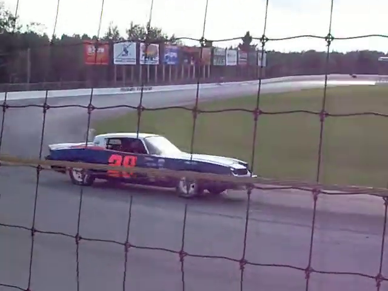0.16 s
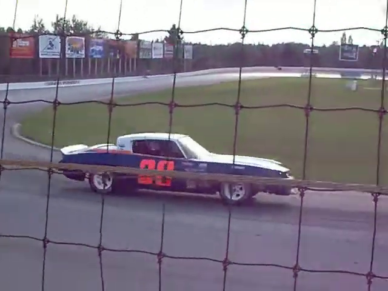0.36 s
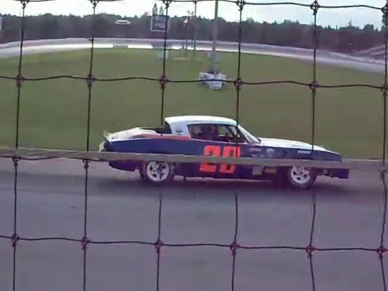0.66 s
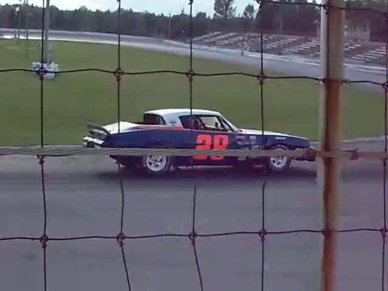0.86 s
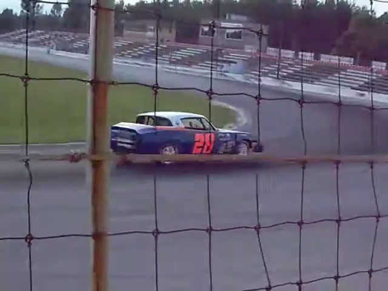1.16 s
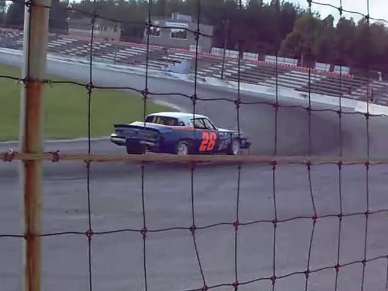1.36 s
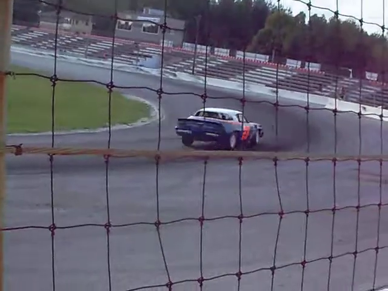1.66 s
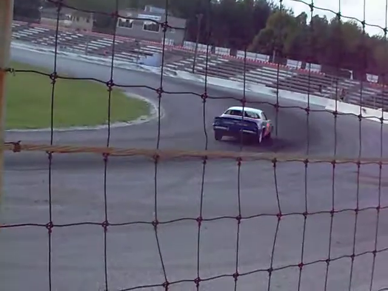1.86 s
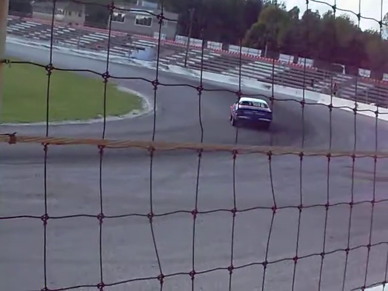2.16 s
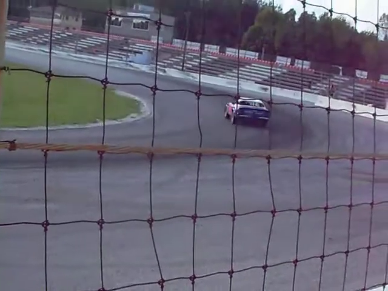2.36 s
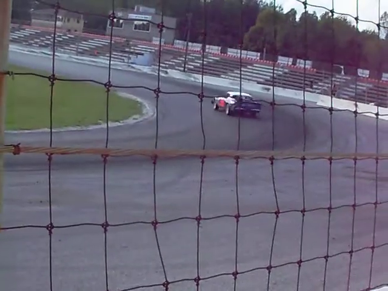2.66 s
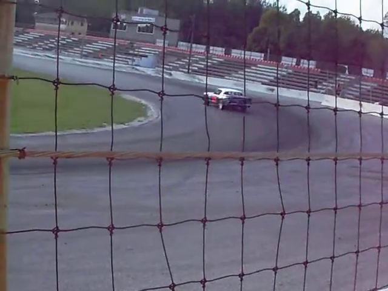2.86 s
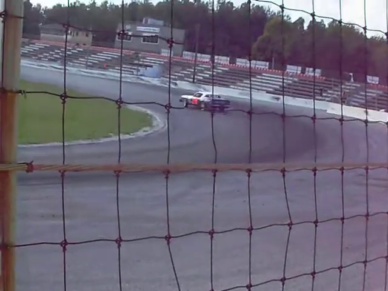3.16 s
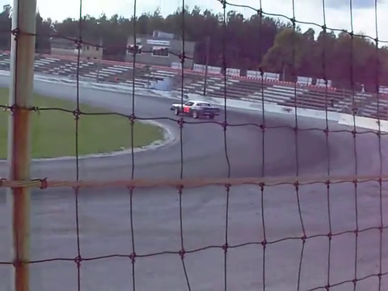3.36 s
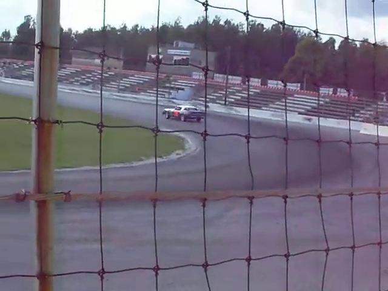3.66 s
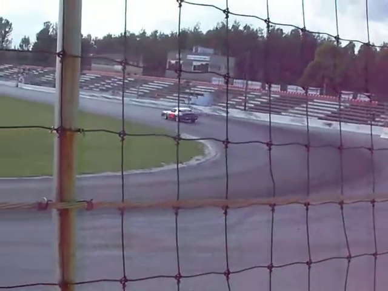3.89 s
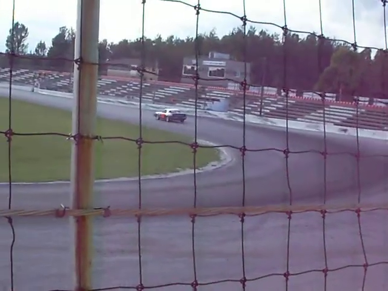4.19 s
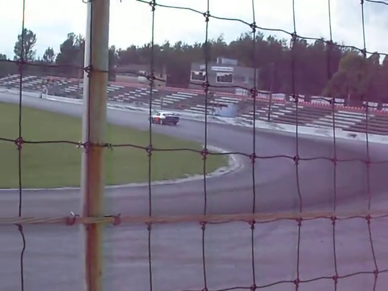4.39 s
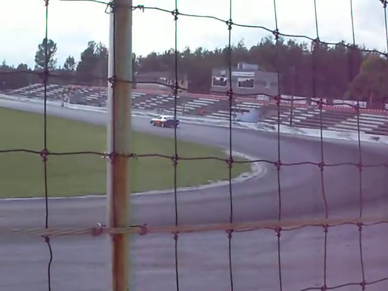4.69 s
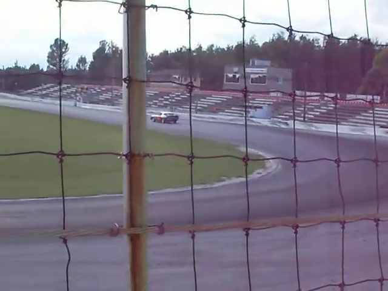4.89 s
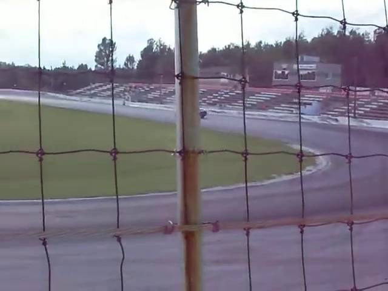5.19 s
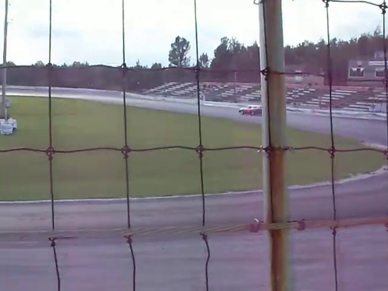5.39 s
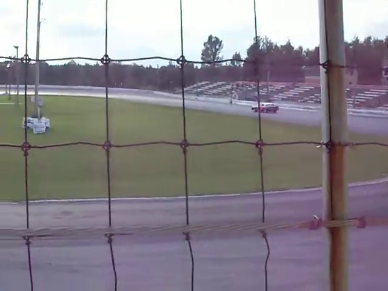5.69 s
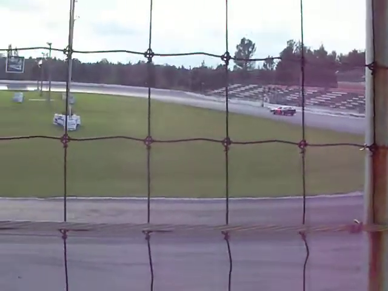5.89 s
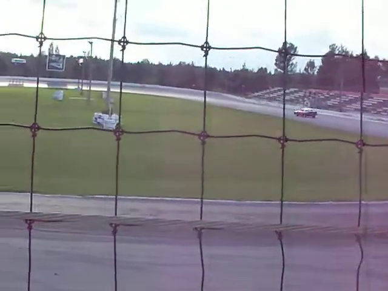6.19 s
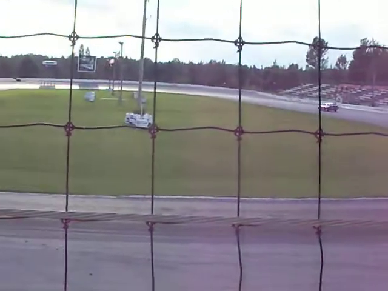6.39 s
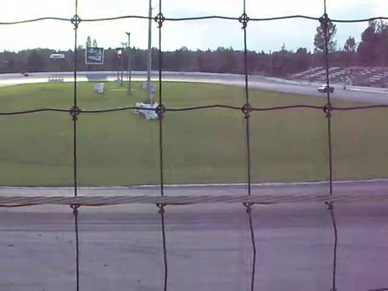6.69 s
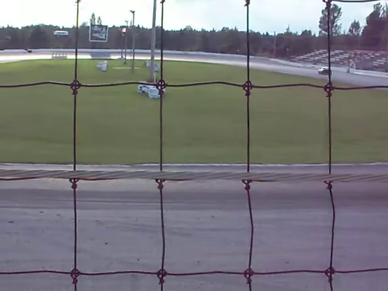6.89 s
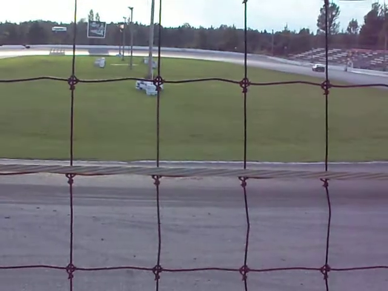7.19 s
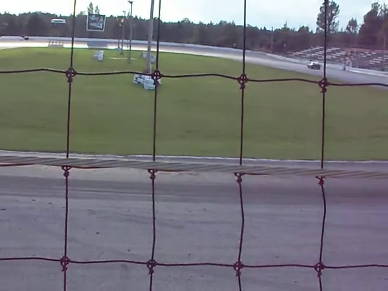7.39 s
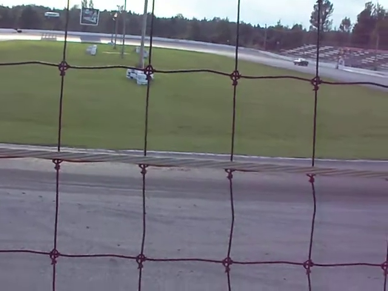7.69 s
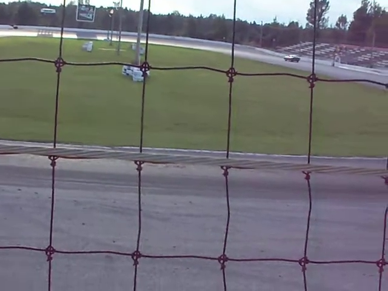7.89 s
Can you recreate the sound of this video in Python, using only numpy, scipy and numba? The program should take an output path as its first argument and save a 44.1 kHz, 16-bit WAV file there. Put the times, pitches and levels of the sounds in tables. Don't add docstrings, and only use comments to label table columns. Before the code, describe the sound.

A rough open-pipe V8 race car blasts past very close, drops in pitch, accelerates away around the track, then lifts off to a distant drone.

```python
import sys
import numpy as np
from scipy import signal
from scipy.fft import rfft, irfft, next_fast_len
from scipy.io import wavfile
from scipy.ndimage import uniform_filter1d
from numba import njit

SR = 44100
rng = np.random.default_rng(int(sys.argv[2]) if len(sys.argv) > 2 else 0)


def ratio_of_db(decibels):
    return 10 ** (np.asarray(decibels, float) / 20)


def pcm_store(signal):
    levels = np.round(np.clip(np.atleast_2d(signal), -1, 1) * 32767)
    wavfile.write(sys.argv[1], SR, levels.astype(np.int16).T)


N = 355005


def level(x, db):
    return x * ratio_of_db(db) / np.sqrt(np.mean(x ** 2))


def columns(table):
    s, *rest = np.transpose(table)
    return [np.interp(np.arange(N) / SR, s, c) for c in rest]


def band(x, hz, width):
    return signal.lfilter(*signal.iirpeak(hz, hz / width, fs=SR), x)


def butter(x, order, hz, kind="low"):
    return signal.sosfilt(signal.butter(order, hz, kind, fs=SR, output="sos"), x)


def colour(x, points):
    hz, db = np.transpose(points)
    size = next_fast_len(N + SR // 4)
    f = np.arange(size // 2 + 1) * SR / size + 1
    gain = ratio_of_db(np.interp(np.log(f), np.log(hz), db))
    return irfft(rfft(x, size) * gain, size)[:N]


def walk(rate):
    k = int(SR / rate)
    steps = np.repeat(rng.standard_normal(N // k + 1), k)
    return 1.142 * uniform_filter1d(uniform_filter1d(steps, k), k)[:N]


def swell(rows, fade_s):
    t = np.arange(0, N + 64, 64) / SR
    gain = 0
    for start, end, db in rows:
        gain = gain + ratio_of_db(db) * (np.tanh((t - start) / fade_s) - np.tanh((t - end) / fade_s)) / 2
    return np.interp(np.arange(N) / SR, t, gain)


def bloom(x, hz, lift, half_width_hz):
    turn = np.exp(2j * np.pi * np.cumsum(hz) / SR)
    slow = butter(x / turn, 1, half_width_hz)
    return x + np.clip(lift, 0, 2) * 2 * (slow * turn).real


def air():
    # (frequency [Hz], density [dB])
    air_tilt = [(24, -50), (40, -31), (155, -11), (333, -10.5), (427, -12.5), (1580, -12), (2320, -26.5),
                (4260, -16.5), (7160, -31), (8770, -54), (11400, -90.5), (19300, -120)]
    return level(colour(rng.standard_normal(N), air_tilt), -52) * ratio_of_db(0.4 * walk(2.9))


def wind():
    # (time [s], peak level [dB])
    gusts = [(.04, -39), (.24, -30.5), (.9, -36), (2.78, -51), (3.75, -47), (4.41, -35), (5.09, -43),
             (5.47, -50), (5.84, -33), (5.97, -30.5), (6.22, -42), (6.41, -42), (6.57, -44), (6.97, -37),
             (7.15, -45), (7.69, -42), (7.85, -45), (8.05, -34)]
    rise_db_s, fall_db_s, calm_db = 142.5, 112.5, -54
    port = [(8, -8.5), (18, 1), (33, 19), (50, -1), (90, -7.5), (200, -60.0)]  # (Hz, dB)
    bumps = colour(rng.standard_normal(N), port)
    bumps = bumps / np.sqrt(uniform_filter1d(bumps ** 2, size=12000))
    t, gust_db = np.arange(N) / SR, calm_db
    for s, db in gusts:
        gust_db = np.maximum(gust_db, db - np.maximum(rise_db_s * (s - t), fall_db_s * (t - s)))
    return bumps * ratio_of_db(uniform_filter1d(gust_db, size=1500))


def knocks():
    # (time [s], level [dB], decay [s])
    bumps = [
        (1.345, -34.5, .03),
        (4.3, -41.5, 0.057),
        (4.43, -39, .05),
    ]
    t = np.arange(N) / SR
    shape = sum(ratio_of_db(db) * (t > s) * np.exp(-np.abs(t - s) / decay_s) for s, db, decay_s in bumps)
    body = [(20, -12), (60, 1), (330, 0), (600, -18), (2000, -44)]  # (Hz, dB)
    return shape * level(colour(rng.standard_normal(N), body), 0)


@njit
def walls(x, lags, gain, damp):
    line, soft, out = np.zeros((8, 8192)), np.zeros(8), np.zeros(len(x))
    for i in range(len(x)):
        total = 0.
        for k in range(8):
            soft[k] += (1 - damp) * (gain[k] * line[k, (i - lags[k]) & 8191] - soft[k])
            total += soft[k]
        out[i] = soft[0] - soft[1] + soft[2] - soft[3]
        for k in range(8):
            line[k, i & 8191] = x[i] + soft[k] - total / 4
    return out


def stands(x):
    t60_s, damp = 1, 0.59
    lags = rng.integers(1200, 6000, 8)
    return ratio_of_db(-11) * walls(x, lags, ratio_of_db(-60 * lags / SR / t60_s), damp)


def track_bounce(x):
    # (time [s], comb top [Hz], share of the bounce [0-1])
    comb = [(0, 4250, 0), (.5, 4740, 0.08), (2.1, 4240, 0.59), (2.7, 4260, 0.47), (3.3, 4130, 0.38),
            (5.0, 4450, 0.26), (5.3, 4230, 0.52), (6.9, 4020, 0.76), (8.05, 3820, 0.67)]
    top_hz, share = columns(comb)
    share = np.clip(share, 0, .9)
    x = bloom(x, top_hz, 1.8 * share ** 2, 150)
    lag = round(0.00027 * SR)
    late = np.roll(signal.hilbert(x, next_fast_len(N))[:N], lag) * np.exp(2j * np.pi * top_hz * lag / SR)
    return (x + share * late.real) / np.sqrt(1 + share ** 2)


def side_paths(x, smear):
    # (delay [ms], level [dB])
    paths = [(3.1, -4), (7.3, -5), (12.5, -7), (19, -8)]
    out, now = x, np.arange(N)
    for ms, db in paths:
        lag = SR / 1000 * (ms + .9 * walk(1.2))
        out = out + (.35 + .9 * smear) * ratio_of_db(db) * np.interp(now - lag, now, x)
    return out


def patchy(x, slow_db, quick_db):
    out = x
    for hz in 1200 * 1.25 ** np.arange(9):
        drift = ratio_of_db(slow_db * walk(2.375) + quick_db * walk(45))
        out = out + (drift - 1) * band(x, hz, hz / 5)
    return out


def rumble(body_db, smear):
    # (frequency [Hz], density [dB])
    rumble_tilt = [(40, -21.5), (80, -5.5), (150, 4), (300, -1.5), (420, -12), (600, -32.5)]
    return smear * ratio_of_db(body_db) * level(colour(rng.standard_normal(N), rumble_tilt), -11)


def thud(cycle):
    near = ratio_of_db(-27) * np.exp(-.5 * ((np.arange(N) / SR - .25) / .06) ** 2)
    dip = np.exp(3 * (np.cos(2 * np.pi * (cycle + .25)) - 1))
    return -3 * near * (dip - dip.mean())


def drone(cycle, body_db, smear):
    main_orders = np.array([3, 5, 6, 8, 10, 11])
    # (multiple, level re body [dB])
    minor_orders = [(1, -29), (2, -20.5), (4, -18), (7, -17.5), (9, -20), (12, -22.5)]
    # (start [s], end [s], level [dB])
    order_swells = [
        [(0, .4, -31.5), (.54, 1.2, -31.5), (2.42, 4.2, -38), (4.42, 5.97, -41.5), (6.05, 7.12, -51.5)],
        [(0, .22, -32.5), (.22, .51, -25.5), (.56, 1.1, -39.5), (1.1, 2.15, -35.5), (2.2, 4.3, -37),
         (4.4, 6.9, -46), (5.95, 6.55, -40.5), (6.9, 7.38, -35), (7.5, 7.73, -34.5), (7.84, 8.2, -32)],
        [(0, 3.1, -44.5), (5.25, 5.92, -45.5), (6.95, 8, -40)],
        [(0, .7, -37), (1.12, 1.65, -35.5), (2.05, 2.58, -35), (2.85, 3.8, -43), (4.5, 5.45, -56.5),
         (7, 8, -52.5)],
        [(0, .55, -36), (1.55, 2.9, -45.5), (6.85, 7.2, -43), (7.3, 8.2, -41)],
        [(1.7, 2.06, -43), (2.25, 2.72, -40), (7.15, 8.2, -46)],
    ]
    out = 0
    for k, rows in zip(main_orders, order_swells):
        turn = 2.2 * smear * walk(.8) + .5 * smear * walk(12)
        gain = swell(rows, .04) + ratio_of_db(body_db - 22 + 2 * walk(3))
        flutter = ratio_of_db(2.0 * smear * walk(16) + 1.85 * smear * walk(5))
        out = out + gain * flutter * np.cos(2 * np.pi * k * cycle + turn)
    for k, db in minor_orders:
        turn = 3 * smear * walk(1.2) + 1.2 * smear * walk(10)
        out = out + ratio_of_db(body_db + db + 2.9 * walk(2.1)) * np.cos(2 * np.pi * k * cycle + turn)
    return np.sqrt(2) * (out + thud(cycle))


def pipe_bark(at, cylinder, chance, smear):
    firing_db = [0, -10, -5, -8, -12, -8, -12, -10]
    header_ms = [0, .9, -.5, .6, -.8, 1.1, .3, -.4]
    far_bank = np.array([0, 1, 0, 0, 1, 0, 1, 1])
    # (frequency [Hz], width [Hz], level [dB])
    pipe = [(350, 45, 10), (480, 46, 13), (587, 300, 20), (800, 360, 16), (1050, 83, 14.5),
            (1450, 170, -30), (1670, 170, -21.5)]
    scatter_db = .6 + 3 * smear[at]
    size = ratio_of_db(np.take(firing_db, cylinder) + scatter_db * chance[0])
    late_s = np.take(header_ms, cylinder) / 1000 + far_bank[cylinder] * .0006 * walk(1.5)[at]
    late_s = late_s + .0003 * smear[at] ** 2 * chance[1]
    pulses = np.zeros(N)
    pulses[np.clip(at + (late_s * SR).astype(int), 0, N - 1)] = size
    bark = sum(ratio_of_db(db) * band(pulses, hz, width) for hz, width, db in pipe)
    bark = bark - band(bark, 140, 200)
    return level(side_paths(butter(bark, 4, 2300), smear), 0)


def gas_puffs(count, since, chance, lumpy, smear):
    spit_db = [-6, -15, 0, -1, -13, -17, -10, -17]
    puff = ratio_of_db(lumpy * np.take(spit_db, count % 8) + 1.4 * chance[2, count]) * np.exp(-since / 1.1)
    puff = uniform_filter1d(puff, size=40) + .15 * smear
    return puff / np.sqrt(uniform_filter1d(puff ** 2, size=5000))


def pressure_front(at, cylinder, chance):
    loudest = cylinder == 0
    front = np.zeros(N)
    front[at[loudest]] = ratio_of_db(.8 * chance[0, loudest])
    return front * swell([(2.033, 4.1, 0)], .06)


def firings(cycle, lumpy, smear):
    # (frequency [Hz], density [dB])
    rasp_tilt = [(350, -30), (700, -14), (1100, -6), (1600, 0), (2100, -1), (2700, -6), (3500, -22)]
    # (frequency [Hz], density [dB])
    growl_tilt = [(200, -40.5), (300, 6.5), (450, -5), (700, -0.5), (1100, -14), (1600, -44)]
    # (frequency [Hz], density [dB])
    jet_tilt = [(1400, -20), (2000, -7), (3500, -0.5), (4400, -1.5), (6000, 0.5), (7500, -6), (8200, -5),
                (9000, -6.5)]
    # (time [s], centre [Hz], lift [0-2])
    bark_focus = [(0, 807, 1), (.35, 800, 1.2), (.55, 350, 0.97), (1.2, 366, 1.1), (2.0, 706, 0.76),
                  (2.25, 1050, 0.8), (2.6, 780, 0.39), (3.6, 886, 1.8), (4.0, 790, 0.65), (4.3, 500, 0.81),
                  (5.3, 480, .7), (6.2, 764, 0.4), (8.05, 980, 0.46)]
    count = (8 * cycle).astype(int)
    since = 8 * cycle - count
    chance = rng.standard_normal((count[-1] + 1, 3)).T
    at = np.flatnonzero(np.diff(count)) + 1
    cylinder, luck = count[at] % 8, chance[:, count[at]]

    bark = pipe_bark(at, cylinder, luck, smear)
    puff = gas_puffs(count, since, chance, lumpy, smear)
    front = pressure_front(at, cylinder, luck)
    rasp = colour(puff ** 0.73 * rng.standard_normal(N), rasp_tilt)
    growl = level(colour(puff ** .5 * rng.standard_normal(N), growl_tilt), -6)
    crack = side_paths(uniform_filter1d(front, size=14), smear)
    crack = level(butter(crack, 1, [200, 1300], "band"), -12)
    bark = bloom(bark + (.5 + smear) * growl, *columns(bark_focus), 170)
    jet = level(puff * rng.standard_normal(N), 0) + level(front, -13)
    return level(level(bark, 0) + crack, 0), level(rasp, 0), level(colour(jet, jet_tilt), 0)


def rasp_layer(rasp, bark_db):
    # (start [s], end [s], level [dB], band centre [Hz])
    surges = [
        (0, 0.427, -23.5, 2030),
        (2.103, 2.6, -38.5, 1460),
        (3.308, 4.055, -46.5, 1720),
        (4.595, 5.05, -55, 1880),
        (6.643, 7.7, -50, 1620),
    ]
    out = (ratio_of_db(bark_db - 9.5) + ratio_of_db(-58)) * rasp
    for start, end, db, hz in surges:
        out = out + swell([(start, end, db)], .1) * band(rasp, hz, hz / 2.25)
    return out


def car():
    # (time [s], engine cycle rate [Hz])
    revs = [(0, 33.2), (.25, 34.2), (.44, 33.3), (.6, 25.6), (.8, 24.1), (1.19, 25.25), (1.65, 25.3),
            (2.11, 26.85), (2.38, 28.8), (2.87, 31), (3.25, 33.2), (3.56, 34), (4.22, 34.4), (4.45, 31.2),
            (5.5, 29.45), (6.9, 29.5), (7.7, 28.3), (8.05, 28.4)]
    # (time [s], body [dB], bark [dB], gas jet over the bark [dB])
    roar = [(0, -28, -24, 2), (.42, -25.5, -25.5, 1), (.56, -27.5, -33.5, 0.5), (.75, -24.5, -32, -4.5),
            (1.2, -32, -41.5, -7.5), (1.45, -32, -37.5, -4.5), (1.93, -30, -36, -2.5),
            (2.0, -30.5, -33.5, 1.5), (2.3, -32, -29.5, -5.5), (2.72, -34, -32, 4), (3.3, -27, -35, -3),
            (3.7, -27, -35, -4), (4.05, -28.5, -41.5, 3), (4.31, -34.5, -58.5, 4), (4.8, -34, -53, 0),
            (5.9, -34.5, -54.5, -3.5), (7.05, -34, -45, -6.5), (8.05, -31, -43.5, -5.5)]
    # (time [s], one jet dominates [0-1.5], smear by echoes and distance [0-1.2],
    # lead of the loudest pipe [turns])
    view = [(0, .8, .4, .57), (.48, .8, .4, .55), (.56, 1.5, .3, .36), (1.0, 1.3, .6, .36),
            (1.15, .3, .9, .3), (1.35, .35, .8, .1), (1.5, .8, .4, -.07), (2.1, 1, .3, -.1),
            (2.35, .6, .3, -.12), (2.75, .65, .3, -.01), (4.12, .25, .35, .02), (4.36, .2, 1.2, 0),
            (4.7, .6, .85, 0), (6, .25, .6, 0), (8.05, .35, .8, 0)]
    hz, = columns(revs)
    body_db, bark_db, aim_db = columns(roar)
    lumpy, smear, lead = columns(view)
    gas_db = bark_db + aim_db
    cycle = np.cumsum(hz) / SR + .856
    bark, rasp, gas = firings(cycle + lead, lumpy, smear)
    gas = gas + np.clip((gas_db + 42.0) / 22, -.7, .6) * band(gas, 7700, 1600)
    hiss = patchy(rasp_layer(rasp, bark_db) + ratio_of_db(gas_db) * gas, 1.5, 2.2)
    bright = ratio_of_db(bark_db - 1.0) * bark + track_bounce(hiss)
    bright = bright - swell([(3.25, 3.83, -2)], 0.18) * band(bright, 1306, 390)
    low = drone(cycle - .012, body_db, smear)
    low = low + rumble(body_db, smear)
    return low + bright + (0.43 + smear) * stands(bright + 0.21 * low)


def scene():
    return (air() + wind() + knocks() + car())[None]


def roll_off(x):
    return signal.sosfilt(signal.butter(12, 8920, fs=SR, output="sos"), x)


def record(dry):
    # (frequency [Hz], gain [dB])
    mic_top = [(7500, 0), (7950, -13), (8500, -16), (9000, -26)]
    limit = np.where(dry > 0, .24, .17)
    x = dry / (1 + np.abs(dry / limit) ** 6) ** (1 / 6)
    x = colour(x[0], mic_top)[None]
    x = signal.sosfilt(signal.ellip(8, .3, 70, 8800, fs=SR, output="sos"), x)
    return roll_off(x)


dry = scene()
out = record(dry)
pcm_store(out)
```